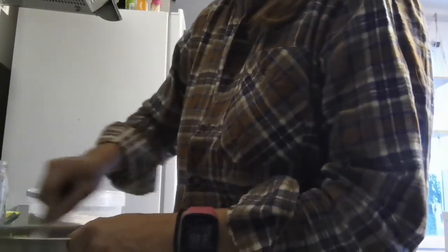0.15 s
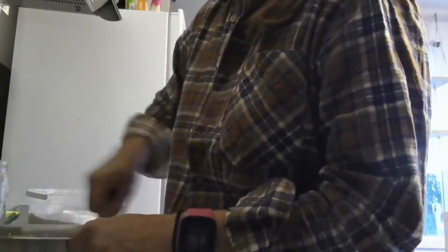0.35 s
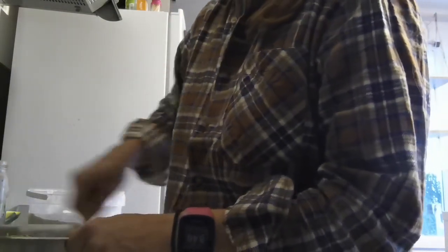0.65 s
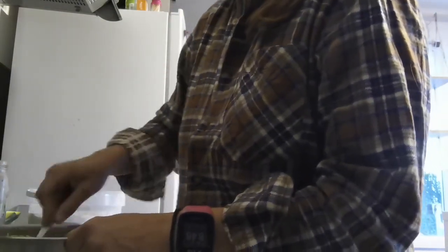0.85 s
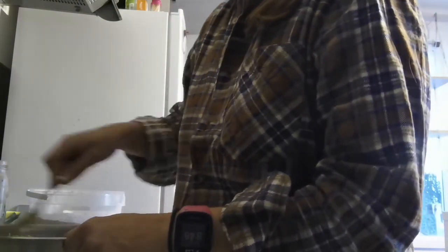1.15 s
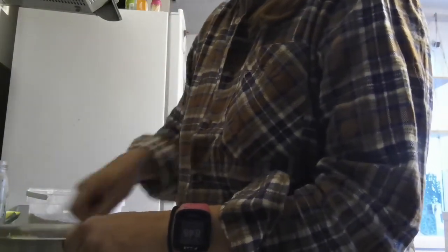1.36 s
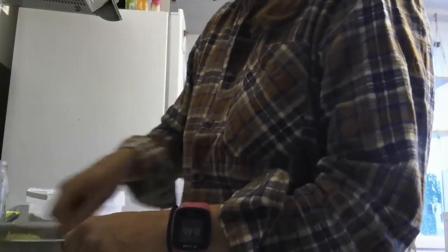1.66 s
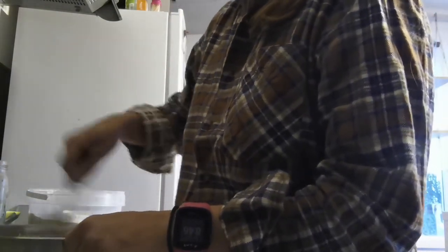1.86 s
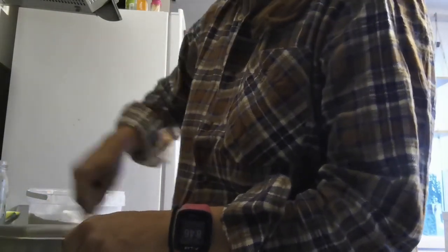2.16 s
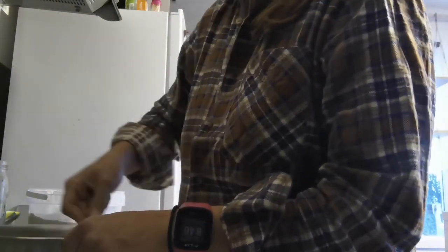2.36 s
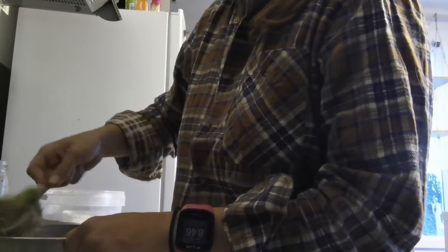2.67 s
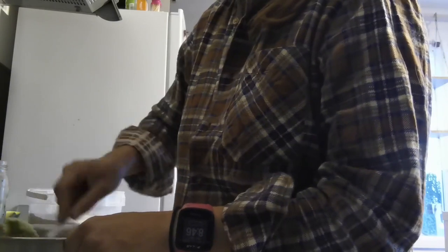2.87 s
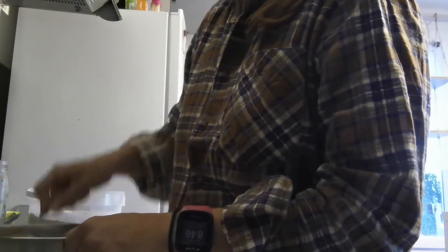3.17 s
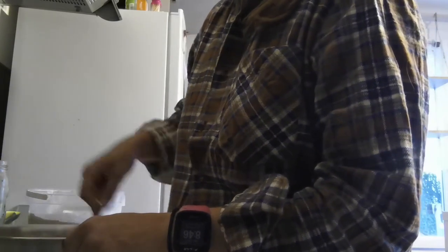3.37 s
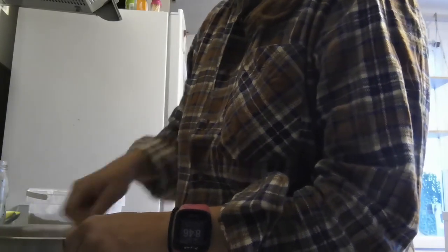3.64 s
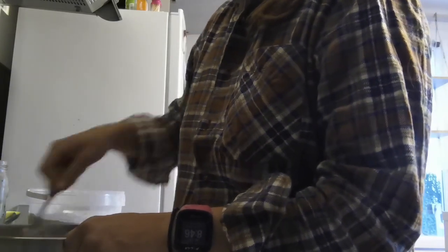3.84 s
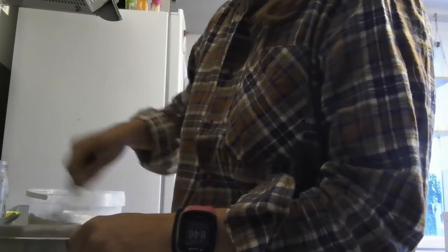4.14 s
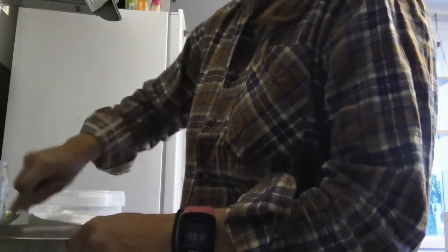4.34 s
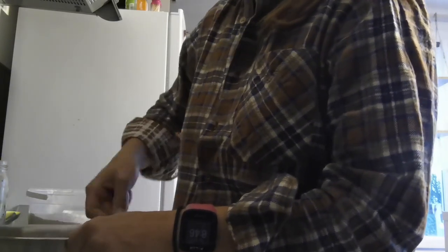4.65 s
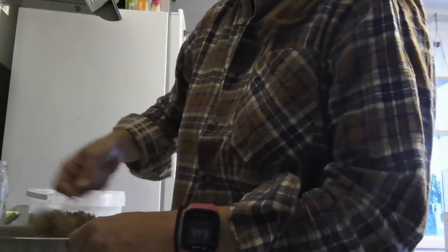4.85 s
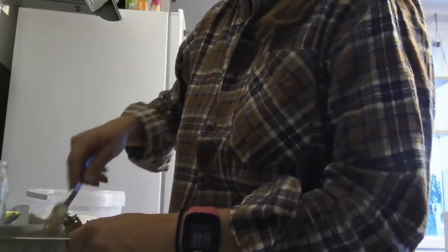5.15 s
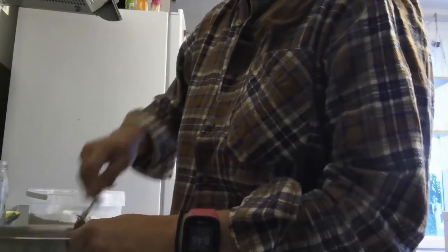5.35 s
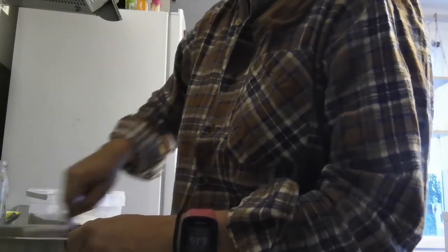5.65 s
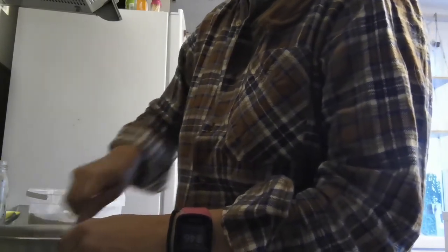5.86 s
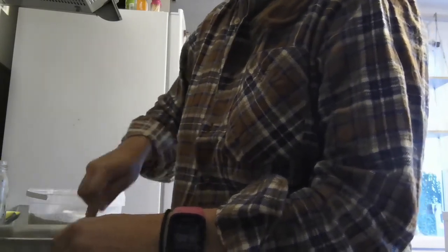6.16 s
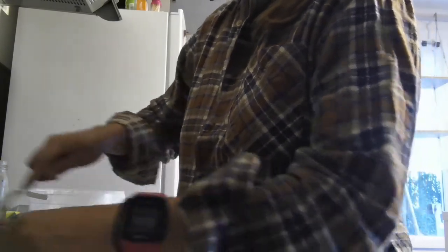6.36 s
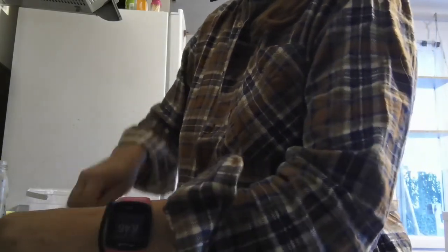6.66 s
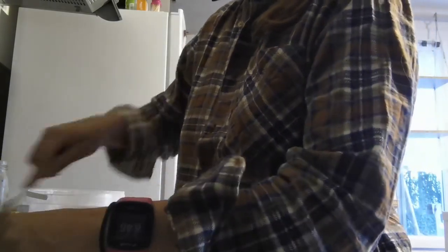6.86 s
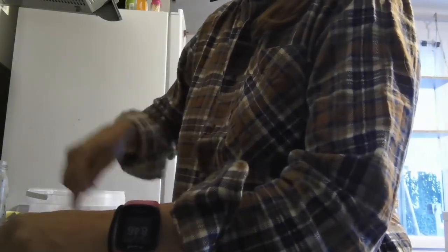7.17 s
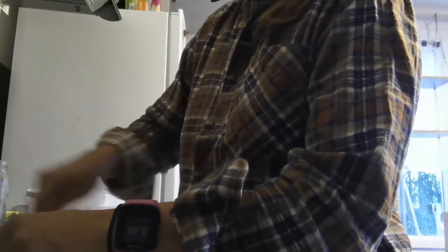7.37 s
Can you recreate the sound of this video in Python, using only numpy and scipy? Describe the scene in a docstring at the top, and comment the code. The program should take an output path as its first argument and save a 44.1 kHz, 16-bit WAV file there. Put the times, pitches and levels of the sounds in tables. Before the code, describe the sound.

A metal spoon stirs thick batter in a bowl, with irregular dull knocks, bright clacks, short scrapes and soft hissing strokes in a small kitchen.

```python
"""Kitchen counter, small room, microphone close to a bowl of thick batter stirred with a metal spoon.
A faint wavering hiss and low rumble run throughout; a knock on the damped bowl opens the 7.5 s.
Strokes follow at once: each hisses through the mix, and the spoon scrapes the wall or clacks on it.
The hardest knock, at 3.44 s, overloads the recorder; after 4.3 s knocks are sparser, with a last
flurry of stirring near 7.2 s. Struck modes, noise bursts, stick-slip impulses and shaped noise make it."""
import sys
import numpy as np
from scipy import signal
from scipy.fft import rfft, irfft, next_fast_len
from scipy.io import wavfile
from scipy.ndimage import map_coordinates

SR = 44100
rng = np.random.default_rng(int(sys.argv[2]) if len(sys.argv) > 2 else 0)


def log_audio(samples):
    """Write samples as a 16-bit WAV file to the path given in sys.argv[1]."""
    # one column per channel
    frames = np.atleast_2d(samples).T
    # limit to full scale, then quantise
    limited = np.clip(frames, -1, 1)
    pcm = np.round(limited * 32767).astype(np.int16)
    wavfile.write(sys.argv[1], SR, pcm)


N = 331191
TIME = np.arange(N) / SR
COARSE = TIME[::100]  # times at which slow curves are worked out
AGE = np.arange(SR // 4) / SR  # time since a contact


def amp(db):
    """Decibels to gain."""
    return np.exp(np.asarray(db) * (np.log(10) / 20))


def unit(x):
    """Scale to rms 1."""
    return x / np.sqrt(np.mean(x ** 2) + 1e-20)


def crest(x):
    """Scale to peak 1."""
    return x / np.abs(x).max()


def along(points, hz):
    """Join (Hz, value) points on a log frequency axis."""
    f, values = np.transpose(points)
    return np.interp(np.log(hz + 1), np.log(f), values)


def wobble(rate):
    """A smooth random curve with rate knots a second."""
    knots = rng.standard_normal(size=4096)
    return np.interp(TIME, COARSE, map_coordinates(knots, [COARSE * rate], mode="wrap"))


def filtered(x, response):
    """Multiply the spectrum of x by a response of frequency."""
    n = x.shape[-1]
    padded = next_fast_len(n + 8192)
    spectrum = rfft(x, padded) * response(np.fft.rfftfreq(padded, 1 / SR))
    return irfft(spectrum, padded)[..., :n]


def shaped(x, spectrum):
    """Colour x by a (Hz, dB) spectrum and scale to rms 1."""
    return unit(filtered(x, lambda hz: amp(along(spectrum, hz))))


def noise(spectrum, size):
    """Coloured noise of rms 1."""
    return shaped(rng.standard_normal(size), spectrum)


def around(hz, centre, octaves):
    """A soft-edged band on a log frequency axis."""
    return 1 / (1 + np.abs(np.log2((hz + 1) / centre) / octaves) ** 3)


def resonances(bands, hz):
    """Causal response of (Hz, width Hz, dB) resonances with alternating sign."""
    total = 0
    for k, (centre, width, db) in enumerate(bands):
        loss = 1j * hz * width
        total = total + (-1) ** k * amp(db) * loss / (centre * centre - hz * hz + loss)
    return total


def narrow_bands(bands):
    """Noise of rms 1 through resonances."""
    return unit(filtered(rng.standard_normal(N), lambda hz: resonances(bands, hz)))


def rubbed(force, modes, damping):
    """A force through an object's modes, their widths scaled by the damping of the touch."""
    bands = [(hz, damping * np.log(1000) / np.pi / t60, db) for hz, db, t60 in modes]
    return filtered(force, lambda hz: resonances(bands, hz))


def slips(rate, spread_db, size):
    """Tiny random impulses, rate a second, of uneven strength."""
    happens = rng.random(size) < rate / SR
    return happens * rng.choice([-1, 1], size) * amp(spread_db * rng.standard_normal(size))


def ring(modes):
    """Struck modes; strength and pitch vary a little at random from blow to blow."""
    hz, db, t60 = np.transpose(modes)[:, :, None]
    sign = (-1) ** np.arange(len(modes))[:, None]
    level = db + 1.5 * rng.standard_normal(hz.shape)
    pitch = hz + 7 * rng.standard_normal(hz.shape)
    decay = np.exp(-np.log(1000) * AGE / t60)
    return crest((sign * amp(level) * decay * np.sin(2 * np.pi * pitch * AGE)).sum(0))


def burst(spectrum, attack, t60):
    """A dying puff of noise: the many weak, crowded modes of a blow."""
    return crest(noise(spectrum, len(AGE)) * (1 - np.exp(-AGE / attack)) * amp(-60 * AGE / t60))


def add(track, s, x):
    """Mix x into the track from time s."""
    start = max(round(s * SR), 0)
    track[start:start + len(x)] += x[:max(N - start, 0)]


def swells(s, length, db, rise_share):
    """Rounded swells with straight flanks in dB, summed in power."""
    away = np.maximum((s - COARSE) / rise_share, (COARSE - s) / (1 - rise_share)) / length
    each = amp(db - 17.7 * (np.hypot(1, away) - 1))
    return np.interp(TIME, COARSE, np.linalg.norm(each, axis=0))


# the hiss also arrives off the moving arm
ARM_ECHO_S, ARM_SWAY_S, ARM_ECHO_DB = 0.0021, 0.00016, -6.5  # delay, its sway, strength


def arm_echo(x):
    """A reflection off the swaying arm combs the hiss into bands that drift."""
    delay = ARM_ECHO_S + ARM_SWAY_S * wobble(2.7)
    return x + amp(ARM_ECHO_DB) * map_coordinates(x, [(TIME - delay) * SR], mode="nearest")


# colour of the background hiss: [f/Hz, relative level/dB per Hz]
AIR_SPECTRUM = [(25, -2.5), (100, -20.5), (250, -20.5), (800, -9), (1300, -8), (1650, -5), (3000, -4.5),
                (4600, -7.5), (5500, -6), (7000, -7), (10000, -7.5), (12000, -14.5), (15800, -24)]
# course of the hiss, before its parts' own gains: [t/s, level/dB]
AIR_COURSE = [(0.0, -45), (3.2, -49), (3.63, -46), (5.49, -49.5), (5.97, -48), (7.5, -57)]
# narrow bands within the hiss: [f/Hz, width/Hz, relative level/dB]
WAVERING_BANDS = [(2366, 80, 3), (2680, 76, 2.5), (4420, 330, -6), (9320, 510, 3)]
# moments when a thin whistle swells in the hiss: [t/s, level/dB]
WHISTLES = [(0.15, -45), (1.0, -52), (2.2, -51), (3.23, -46), (4.0, -46), (4.8, -51.5), (5.85, -46.5)]
# hissy bands that swell with the whistle: [f/Hz, width/Hz, relative level/dB]
WHISTLE_COMPANIONS = [(2400, 132, 3.5), (2790, 89, 2), (3420, 250, -4)]
# colour of the low rumble: [f/Hz, relative level/dB per Hz]
RUMBLE_SPECTRUM = [(12, -6), (30, -14.5), (70, -4), (150, -10.5), (400, -14.5), (1500, -31.5)]
WHISTLE_HZ, WHISTLE_DRIFT_HZ, WHISTLE_WIDTH_HZ = 1894, 28, 60
WHISTLE_SWELL_S = 0.61


def background(air_db=3, bands_db=-1, companions_db=-6, flutter_depth=0.71, rumble_db=-55):
    """Faint shaped noise in which narrow bands and a thin whistle waver, over a low rumble."""
    level = np.interp(TIME, *np.transpose(AIR_COURSE))
    air = amp(air_db) * unit(arm_echo(noise(AIR_SPECTRUM, N)))
    bands = amp(bands_db + wobble(4.18)) * narrow_bands(WAVERING_BANDS)

    slow_noise = filtered(rng.standard_normal(N), lambda hz: 1 / (1 + (hz / WHISTLE_WIDTH_HZ) ** 2))
    flutter = unit(1 + flutter_depth * unit(slow_noise))
    pitch = WHISTLE_HZ + WHISTLE_DRIFT_HZ * wobble(4.2)
    whistle = flutter * np.sin(2 * np.pi * np.cumsum(pitch) / SR)
    companions = amp(companions_db) * narrow_bands(WHISTLE_COMPANIONS)
    s, db = np.transpose(WHISTLES)[:, :, None]
    whine = swells(s, WHISTLE_SWELL_S, db, rise_share=0.48) * (whistle + companions)

    rumble = amp(rumble_db) * noise(RUMBLE_SPECTRUM, N)
    return amp(level) * (air + bands) + whine + rumble


# spoon knocks the bowl: [t/s, level/dB before the body trim, counter thump level/dB re body,
# wall rap level/dB re body, graze before landing t/s (9 ms or less lands clean)]
BOWL_KNOCKS = [(0.012, -14.5, 2.5, -8, .011), (0.509, -23, -2, 2, 0), (0.8571, -5, -19.5, -1.5, 0.0057),
               (1.027, -31.5, -12, -21, 0), (1.549, -7, -5.5, -7.5, 0.004), (1.8042, -12, -4, 12.5, 0),
               (1.921, -5.5, -7, -8.5, 0.021), (2.228, -19, -18, -24, 0), (2.282, -24, -18, 6, 0.013),
               (3.4397, 3.5, -8.5, -3.5, 0.0063), (3.506, -9.5, -9, -6, 0.016), (3.813, -3, -10, -11, 0),
               (3.899, -7.5, -13, -3, 0.00023), (4.122, -17.5, 3.5, 3, 0.0055), (4.229, -2.5, -8, -8, .018),
               (5.712, -10, -6.5, -11, 0), (6.732, -28, 5.5, -22, 0), (7.151, -21.5, 6.5, 1, 0.0026),
               (7.222, -17.5, -2, -14, 0.0089)]
GRAZE_DB, GRAZE_RAP_DB = -9, 2.5  # a grazing touch is lighter and brighter than the blow after it


def contacts():
    """Every touch on the bowl: a glancing spoon grazes the wall twice before it lands."""
    for s, db, thump, rap, graze in BOWL_KNOCKS:
        yield s, db, thump, rap
        if graze > 0.009:
            for early in (graze, graze / 2):
                yield s - early, db + GRAZE_DB, thump, rap + GRAZE_RAP_DB


# modes of the bowl with its load: [f/Hz, relative level/dB, t60/s]
BOWL_MODES = [(64.6, -21, 0.21), (87.3, -13.5, 0.16), (137.4, -13.5, 0.099), (202.5, -22, 0.077),
              (289.6, -3.5, 0.085), (339.7, 3.5, 0.017), (423.5, 1.5, 0.03), (445.3, -10.5, 0.073),
              (481, -26.5, 0.15), (567.3, -16, 0.11), (644, -19.5, 0.15), (677, -17, 0.083),
              (871, -9.5, 0.06), (939, -9, 0.063), (1117, -12, 0.029), (1241, -9, 0.034),
              (1399, -15.5, 0.041), (1524, -15, 0.033), (2170, -47, .04)]
# crowded low modes of the loaded bowl: [f/Hz, relative level/dB per Hz]
BELLY_SPECTRUM = [(60, -22), (170, -8), (320, 5.5), (520, -8.5), (900, -16.5), (2000, -37.5)]
# crowded modes heard with the wall rap: [f/Hz, relative level/dB per Hz]
THUD_SPECTRUM = [(100, -11.5), (400, -16), (900, -6), (1500, -14), (1900, -19), (3500, -32.5), (8000, -66)]
# the bowl rocks softly on the counter: [t/s, level/dB before a 2.5 dB cut]
BOWL_BUMPS = [(0.187, -28), (0.521, -23), (2.302, -27), (2.392, -32.5), (5.207, -36.5), (6.115, -31),
              (6.223, -26.5), (6.47, -34.5)]


def knocks(body_db=-1, thump_hz=170, rap_hz=780, push_hz=480, hard_hz=1300):
    """Each knock has its own share of low thump and wall rap; a stronger rap favours higher wall modes."""
    out = np.zeros(N)
    counter = [mode for mode in BOWL_MODES if mode[0] < thump_hz]
    belly = [mode for mode in BOWL_MODES if thump_hz <= mode[0] < rap_hz]
    push = crest(np.sin(2 * np.pi * push_hz * AGE) * amp(-60 * AGE / 0.028))  # the wall's first give
    for s, db, thump, rap in contacts():
        crowd = burst(BELLY_SPECTRUM, attack=0.001, t60=0.11)
        body = crest(ring(belly) + amp(-13.5) * push + amp(-10) * crowd)
        # a stronger rap share moves the favoured wall modes upward
        centre_hz = hard_hz * 2 ** (rap / 20)
        wall = [(hz, level - 12 * abs(np.log2(hz / centre_hz)), t60)
                for hz, level, t60 in BOWL_MODES if hz >= rap_hz]
        upper = ring(wall) + amp(-4.5) * burst(THUD_SPECTRUM, attack=0.00032, t60=0.11)
        edges = amp(thump) * unit(ring(counter)) + amp(rap) * unit(upper)
        add(out, s, amp(db + body_db) * (body + body.std() * edges))
    for s, db in BOWL_BUMPS:
        soft_onset = 1 - np.exp(-AGE / 0.0036)
        add(out, s, amp(db - 2.5) * ring(counter) * soft_onset)
    return out


def walls(x, echo_db):
    """Early echoes off the bowl's sides and the counter comb the treble."""
    delays_s = rng.uniform(0.0006, 0.009, 6)
    return x + amp(echo_db) * sum(np.roll(x, round(d * SR)) for d in delays_s)


# strokes through the mix: [t/s at full speed, length/s, hiss level/dB, drag on the bowl level/dB]
STROKES = [(0.218, 0.23, -29, -39.5), (0.398, 0.072, -33.5, -64), (0.53, .09, -28.5, -36),
           (0.67, 0.26, -36, -46.5), (0.89, .14, -30.5, -39), (1.18, 0.069, -37.5, -41),
           (1.521, 0.11, -31, -42.5), (1.863, 0.12, -32.5, -40), (2.309, 0.14, -26, -35),
           (2.476, 0.2, -28, -46), (2.68, 0.12, -40, -59.5), (3.418, 0.13, -37.5, -48),
           (3.53, 0.093, -34, -37), (3.824, .11, -31.5, -36.5), (4.171, .09, -34, -39.5),
           (4.76, 0.32, -28.5, -45.5), (5.196, 0.13, -34, -68), (5.66, 0.12, -35.5, -63),
           (5.87, 0.3, -41.5, -47), (6.062, 0.15, -32.5, -57), (6.155, 0.26, -49.5, -43.5),
           (6.502, .16, -56, -45.5), (6.842, 0.13, -33, -41), (7.203, 0.12, -26, -39)]
# colour of the mix shearing: [f/Hz, relative level/dB per Hz]
MIX_SPECTRUM = [(1800, -15.5), (3000, -12), (4500, -16.5), (5500, -11), (6400, -5.5), (7400, -2),
                (9000, 0.5), (10000, -3.5), (11000, -9.5), (13000, -14), (15800, -23)]
RISE_SHARE = 0.46  # part of a stroke spent gathering speed
# the spoon's edge cuts in ahead of each stroke with a narrower, lower hiss
EDGE_HZ, EDGE_DB, EDGE_LEAD_S = 6420, -12.5, 0.017


def sweeps(grain_db=-5):
    """Fine grains of the mix shear past the spoon, its edge first, and its drag murmurs in the bowl."""
    s, length, hiss_db, drag_db = np.transpose(STROKES)[:, :, None]
    grains = shaped(slips(rate=4100, spread_db=2.5, size=N), MIX_SPECTRUM)
    shear = unit(walls(noise(MIX_SPECTRUM, N) + amp(grain_db) * grains, echo_db=-7))
    shear *= amp(2.16 * wobble(41))
    edge_slips = slips(rate=6700, spread_db=7.5, size=N)
    edge = unit(filtered(edge_slips, lambda hz: around(hz, EDGE_HZ, octaves=0.12)))
    drag = rubbed(slips(rate=1200, spread_db=5.5, size=N), BOWL_MODES, damping=1.35)
    drag = shaped(drag, [(60, -13), (300, -6.5), (700, -1.5), (1200, 8.5), (2300, -7)])
    drag *= amp(0.4 * wobble(19))
    return (shear * swells(s, length, hiss_db, RISE_SHARE)
            + edge * swells(s - EDGE_LEAD_S, length, hiss_db + EDGE_DB, RISE_SHARE)
            + drag * swells(s, length, drag_db, RISE_SHARE))


# modes of the spoon, for scrapes and clacks: [f/Hz, relative level/dB, t60/s]
SPOON_MODES = [(1820, -12, 0.087), (2197, -3.5, 0.052), (2433, -5.5, 0.068), (2514, -10, 0.014),
               (3090, -3.5, 0.027), (3427, -1, 0.017), (3765, -4.5, 0.046), (4050, 2.5, 0.052),
               (4450, -7, 0.044), (4524, -1, 0.045), (5510, 0, 0.013), (7870, 0, 0.035)]
# spoon drags along the wall: [t/s of hardest push, rise over the last 20 dB t/s,
# judder level/dB, judder f/Hz, squeal level/dB, squeal f/Hz]
WALL_SCRAPES = [(0.196, 0.093, -34, 1310, -42, 4500), (0.285, 0.033, -35.5, 1350, -39, 7000),
                (0.526, 0.032, -24.5, 1240, -28, 3700), (0.84, 0.053, -19.5, 654, -30, 2200),
                (0.897, .015, -32.5, 800, -32, 3300), (1.026, 0.006, -32, 684.7, -58, 3000),
                (1.804, 0.013, -30, 1270, -29, 7500), (2.235, 0.008, -29, 1410, -32.5, 6870),
                (2.29, 0.015, -25, 1501, -29, 6200), (2.43, 0.12, -31.5, 1342, -36, 3000),
                (3.47, 0.024, -37, 1200, -33, 2600), (3.731, 0.0049, -31, 1240, -40, 6400),
                (6.122, 0.046, -34, 302, -44.5, 3000), (6.86, .07, -47, 1093, -40, 4000),
                (7.154, 0.0043, -26.5, 1080, -39, 3000), (7.19, 0.028, -19.5, 710, -19, 3700)]
RELEASE_S = 0.051  # a scrape falls 20 dB in this time once the hand eases off


def scrapes(damping=1.8, spoon_damping=0.9, uneven_db=2.5):
    """The spoon sticks and slips on the wall, shaking both bowl and spoon."""
    out = np.zeros(N)
    lead_s = 0.1  # room for the push to build
    t = AGE - lead_s
    force = slips(rate=1800, spread_db=4, size=(len(WALL_SCRAPES), len(t)))
    bowl = rubbed(force, BOWL_MODES, damping)
    spoon = unit(rubbed(force, SPOON_MODES, spoon_damping)) + amp(0.5) * unit(force)
    for row, low, high in zip(WALL_SCRAPES, bowl, spoon):
        s, rise, judder_db, judder_hz, squeal_db, squeal_hz = row
        push = amp(-20 * np.maximum(-t / rise, t / RELEASE_S))
        judder = unit(filtered(low, lambda hz: around(hz, judder_hz, octaves=0.58)))
        squeal = unit(filtered(high, lambda hz: around(hz, squeal_hz, octaves=0.64)))
        add(out, s - lead_s, push * (amp(judder_db) * judder + amp(squeal_db) * squeal))
    return out * amp(uneven_db * wobble(110))


# hard contacts of the spoon: [t/s, time to bite t/s, ring level/dB, tick level/dB, tick width/octaves]
HARD_CLACKS = [(0.209, 0.0024, -13.5, -20.5, .7), (0.526, 0.0074, -14, -16, 0.38),
               (0.876, 0.00045, 3, -8.5, 0.29), (1.8, 0.003, -26, -3.5, 0.78),
               (3.4402, 0.00053, -18, -30, .8), (4.123, 0.0026, -24.5, -23, 0.72),
               (5.197, 0.0022, -49, -10.5, 0.22), (7.206, 0.0052, -16, -15, .6)]
# colour of the bright tick: [f/Hz, relative level/dB per Hz]
TICK_SPECTRUM = [(2000, -9.5), (5000, -8.5), (7000, 2.5), (10000, -4), (15800, -11.5)]
TICK_HZ = 8700  # centre of the tick


def clacks():
    """Bare metal meets the wall: a bright tick and a ring that the hand soon damps."""
    out = np.zeros(N)
    clang = [(1200, -24), (2400, 0), (4200, 11), (5500, -15), (12000, -9)]  # f/Hz, level/dB per Hz
    for s, bite, ring_db, tick_db, width in HARD_CLACKS:
        metal = ring(SPOON_MODES) + amp(1) * burst(clang, attack=0.00032, t60=0.039)
        tick = burst(TICK_SPECTRUM, attack=0.00068, t60=0.051)
        tick += amp(-19.5) * burst(TICK_SPECTRUM, attack=0.011, t60=0.15)  # slower, longer tail
        tick = filtered(tick, lambda hz: around(hz, TICK_HZ, width))
        contact = 1 - np.exp(-(AGE / bite) ** 2)
        add(out, s, amp(ring_db) * crest(contact * metal) + amp(tick_db) * crest(contact * tick))
    return out


# decay of the small room: [f/Hz, t60/s]
ROOM_DECAY = [(70, 0.82), (300, 0.42), (1000, 0.29), (4000, 0.26), (12000, 0.17)]


def kitchen(x):
    """The room's answer: convolution with decaying noise, longest in the bass."""
    hz, t, cells = signal.stft(rng.standard_normal(SR), SR, nperseg=256)
    decay = amp(-60 * t / along(ROOM_DECAY, hz)[:, None])
    tail = signal.istft(cells * decay, SR, nperseg=256)[1]
    tail *= 1 - np.exp(-np.arange(len(tail)) / SR / 0.001)
    return signal.fftconvolve(x, tail / np.linalg.norm(tail))[:N]


def scene():
    """Everything lies in the middle, alike in both channels."""
    bowl = knocks()
    spoon = clacks() + scrapes()
    room = kitchen(amp(-14.5) * bowl + amp(-7.5) * spoon)
    mid = bowl + spoon + room + sweeps() + background()
    return np.array([mid, mid])


DC_OFFSET = -0.0038  # re full scale
TOP_HZ = 15800


def record(dry):
    """The recorder sits slightly off zero, clips at full scale and keeps nothing above its band limit."""
    clipped = np.clip(dry + DC_OFFSET, -1, 1)
    return filtered(clipped, lambda hz: hz < TOP_HZ)


dry = scene()
out = record(dry)
log_audio(out)
```